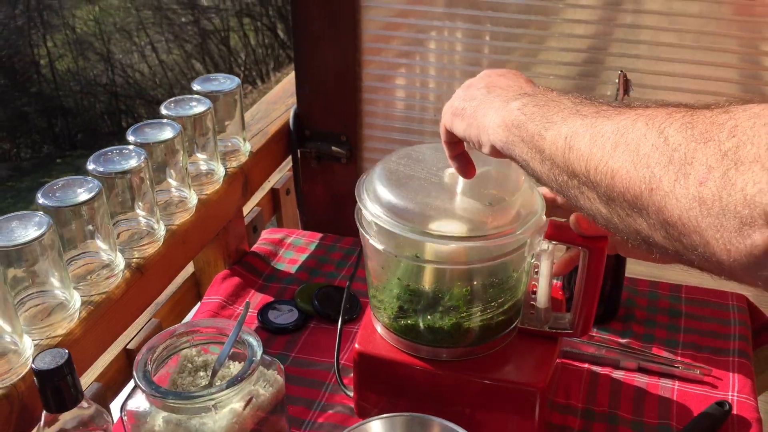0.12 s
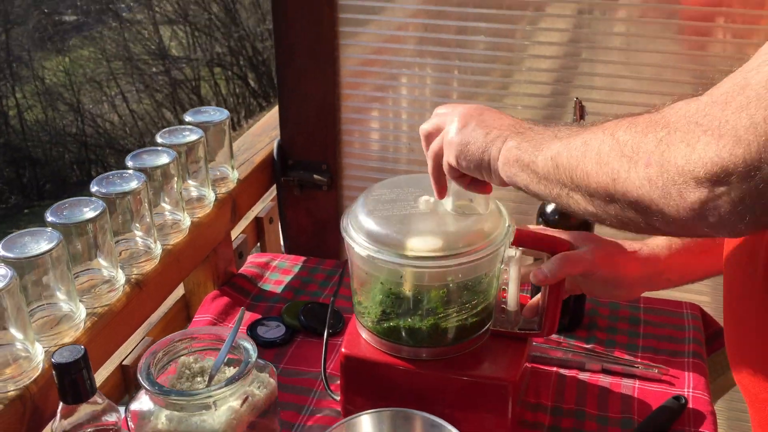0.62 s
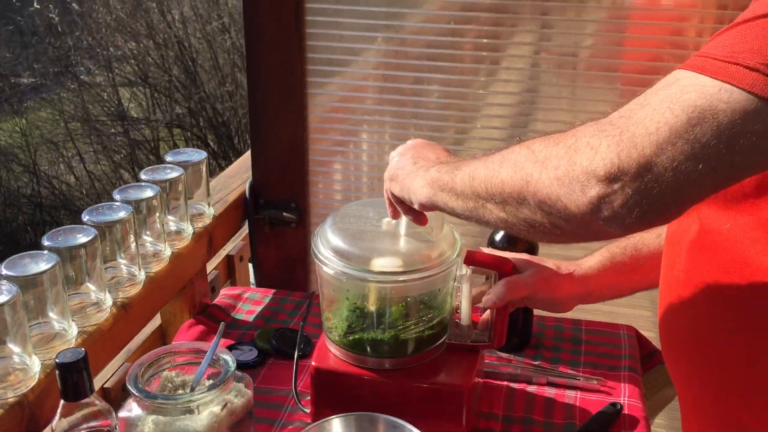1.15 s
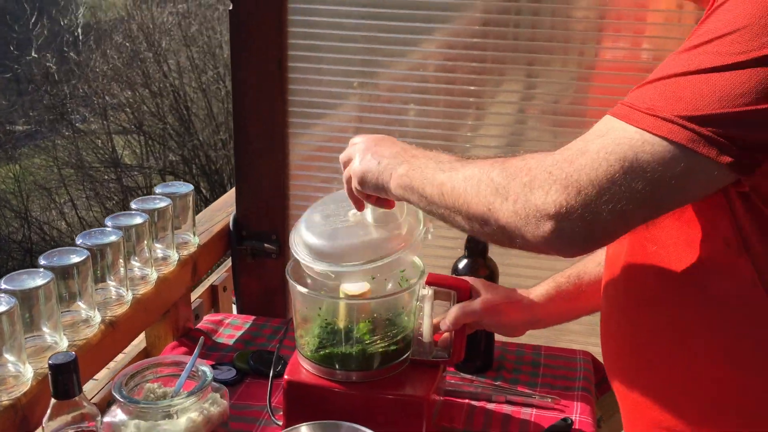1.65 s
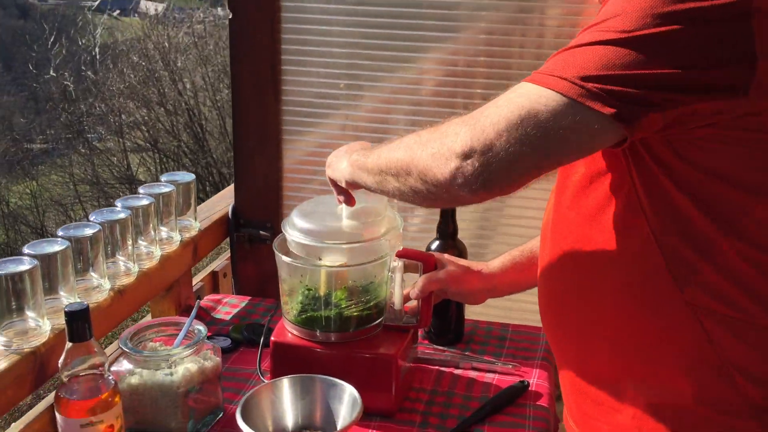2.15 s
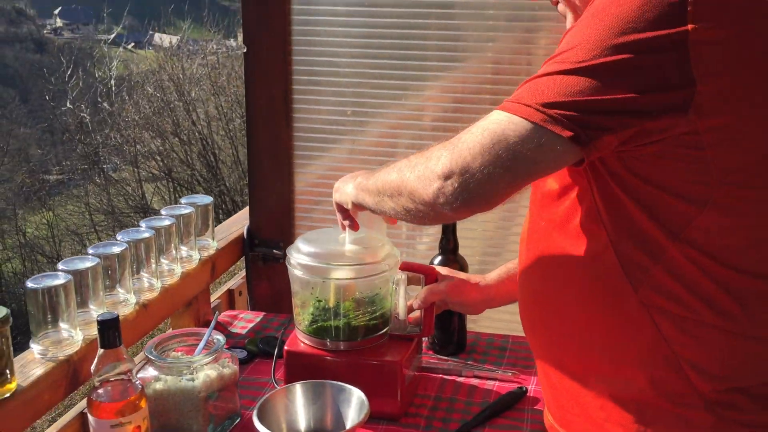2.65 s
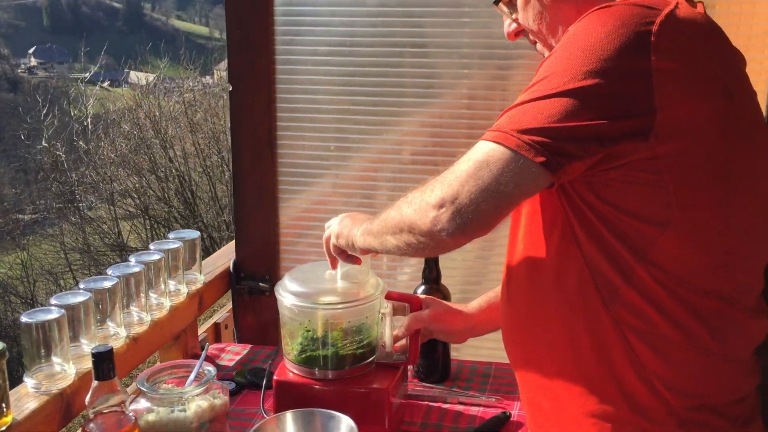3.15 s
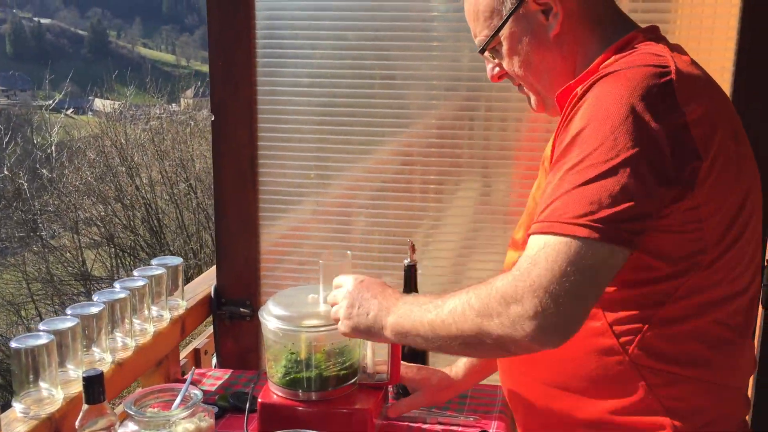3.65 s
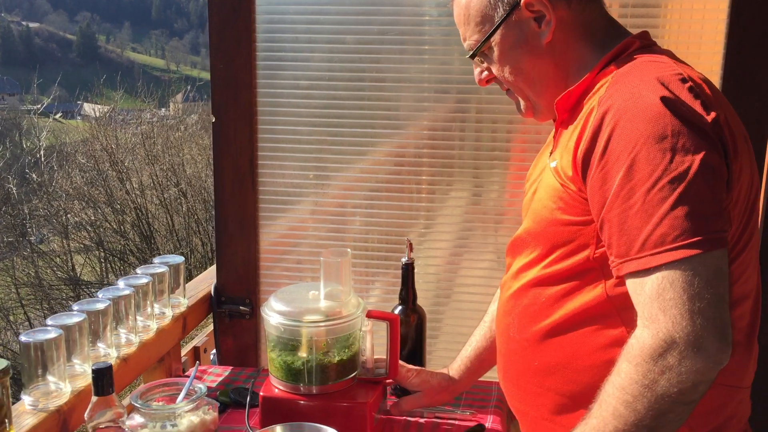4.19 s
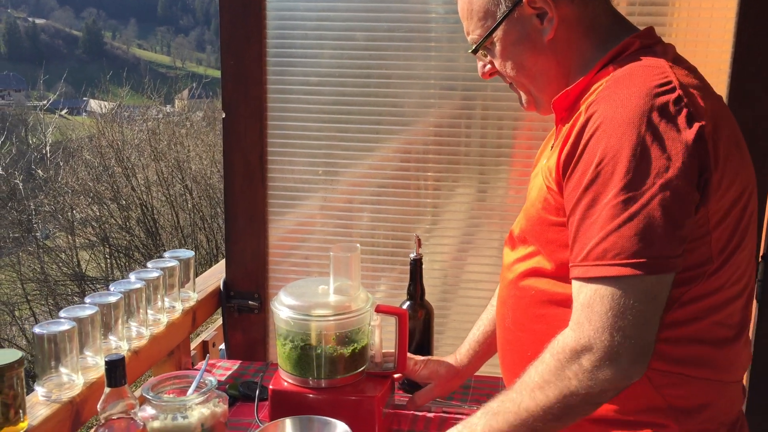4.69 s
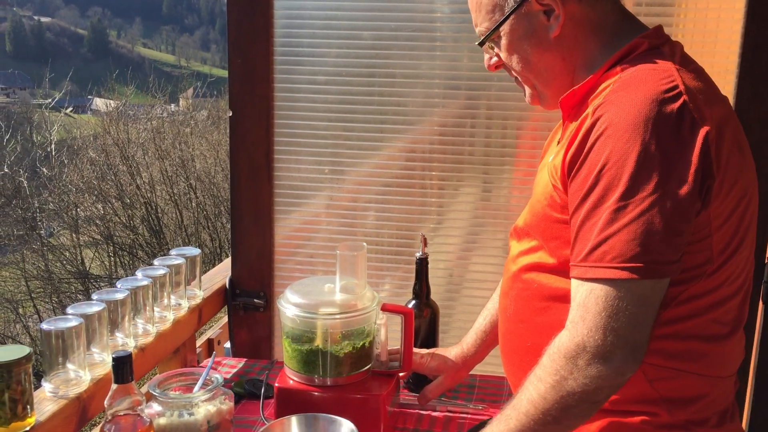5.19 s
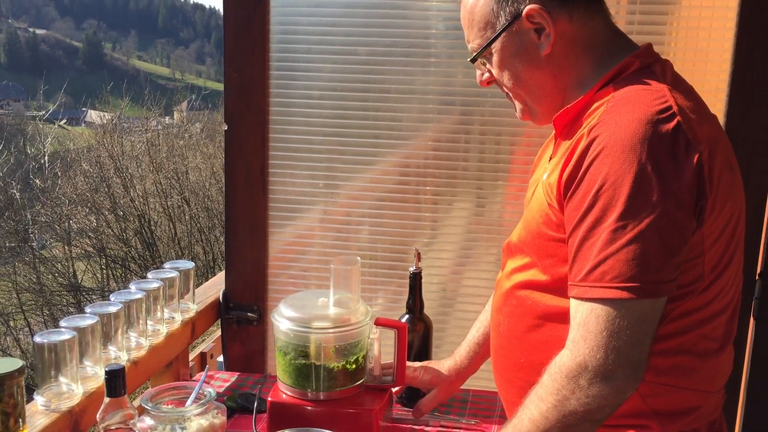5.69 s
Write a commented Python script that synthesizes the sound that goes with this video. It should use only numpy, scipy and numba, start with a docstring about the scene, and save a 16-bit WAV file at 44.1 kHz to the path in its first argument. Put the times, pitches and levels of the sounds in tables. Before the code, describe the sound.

A hollow plastic lid scrapes and knocks onto a food processor bowl, then a switch clicks and the motor churns wet leaves in a steady rough whir.

```python
"""A distant valley hush and a light, boomy scrape: on a breezy balcony a plastic lid slides on a bowl's rim.
Knocks, scrapes and a latch follow as a hand fits the lid to the food processor. Blows and friction ring
the shell modes, and the air in the bowl booms lower as the gap under the lid closes. Then a switch clicks
and a mains motor whirls a blade through leaves: rough noise pulsing with the turn, a growl and a thin whine.
Low, shaped noise swells for gusts on the microphone and for thumps of the table under some knocks."""
import sys
import numpy as np
from scipy import signal
from scipy.fft import rfft, irfft
from scipy.io import wavfile
from scipy.ndimage import uniform_filter1d
from numba import njit

SR = 44100
rng = np.random.default_rng(int(sys.argv[2]) if len(sys.argv) > 2 else 0)


def linear_from_db(decibels):
    """Turn decibels (scalar or array-like) into linear amplitude factors; 0 gives 1."""
    return 10 ** (np.asarray(decibels, float) / 20)


def put_to_file(sound):
    """Save the sound as 16-bit audio at rate SR, in the file named by the first command-line argument."""
    columns = np.atleast_2d(sound).T  # one column per channel
    safe = np.clip(columns, -1, 1)
    whole_steps = np.round(safe * 32767)
    wavfile.write(sys.argv[1], SR, whole_steps.astype(np.int16))


N = 256662
T = np.arange(N) / SR

# distant hush, spectrum before scaling: f/Hz, level/dB
VALLEY_COLOUR = [(88, -27.5), (150, 3.5), (226, -3.5), (328, 0.5), (475, -5), (805, -1.5), (4950, -26),
                 (5460, -25), (12700, -31), (16000, -40.5)]
# swells of low noise, gusts and table thumps together: start t/s, length t/s, level/dB
LOW_SWELLS = [(0.294, 0.12, -59), (0.523, 0.046, -55), (0.721, .06, -44.5), (1.2, .1, -60),
              (1.547, 0.032, -42.5), (1.697, 0.027, -36), (1.84, 0.024, -37.5), (2.066, 0.035, -36),
              (2.416, 0.085, -34), (2.59, 0.12, -39), (2.89, 0.067, -45), (3.095, 0.15, -40),
              (3.626, 0.02, -40), (3.76, 0.9, -43), (4.156, .43, -30), (4.782, 0.31, -38.5),
              (5.359, 0.144, -37.5), (5.76, .1, -43)]
# low thumps of the table under the knocks: start t/s, length t/s, level/dB
TABLE_THUMPS = [LOW_SWELLS[i] for i in (1, 2, 10)]
# gusts on the microphone: start t/s, length t/s, level/dB
GUSTS = [row for row in LOW_SWELLS if row not in TABLE_THUMPS]
# spectrum of gusts and thumps before scaling: f/Hz, level/dB
LOW_COLOUR = [(12, -33), (20, 3.5), (77, -7.5), (129, -12), (189, -23.5), (242, -32), (400, -54),
              (520, -71.5), (880, -120)]
# lid sliding on the rim: start t/s, length t/s, scrape level/dB, boom level/dB relative to the scrape
SLIDES = [(-.02, 0.069, -47.5, 9), (0.051, 0.089, -44, 11.5), (0.203, 0.067, -44, -10),
          (0.864, 0.12, -58, -4.5), (0.957, .06, -61, -8.5), (1.1, 0.099, -67, 19), (1.545, .15, -46.5, 12),
          (2.17, 0.38, -58, -2), (2.16, 0.059, -52, -0.5), (2.234, 0.074, -47.5, -1), (2.325, .1, -48, 0.5),
          (2.446, 0.09, -56.5, 8), (2.543, 0.053, -50, 6), (2.717, 0.046, -32, -2), (2.969, 0.17, -51, -6),
          (3.541, 0.037, -54.5, -4.5), (3.582, 0.033, -53.5, -8), (4.05, .02, -49.5, 4),
          (1.752, 0.048, -63.5, 0), (1.977, 0.076, -68, -3.5), (0.517, 0.031, -55.5, 4)]
# modes of bowl and lid: f/Hz, level/dB, decay by 60 dB under a blow t/s
SHELL_MODES = [(582, -6, .014), (644, -9, 0.047), (930, -5.5, .01), (1243, -3.5, 0.0073), (1410, 1, 0.0099),
               (1535, 2.5, 0.0063), (1725, -4, 0.0066), (2190, -3, 0.0095), (2316, -4.5, 0.011),
               (2523, -5, 0.022), (2840, -2, 0.0065), (3290, -7, 0.0073), (3570, -4.5, 0.01),
               (4230, -7.5, 0.012), (5400, -10.5, 0.0056), (5230, -10, 0.009), (6490, -14.5, 0.023)]
# air in the bowl, lower as the gap under the lid closes: t/s, f/Hz
BOWL_AIR = [(0, 460), (.15, 288), (.29, 275), (.33, 211.5), (.7, 192), (.735, 136), (1.12, 168),
            (1.262, 210.3), (1.62, 198), (1.67, 346), (2.1, 362.6), (2.43, 417), (2.53, 334), (2.73, 362.5),
            (2.9, 154.5), (3.05, 345), (3.19, 222.6), (4.06, 374.5), (4.1, 243)]
# knocks of lid on bowl, the last two from the switch:
# t/s, clack level/dB, treble and boom level/dB relative to the clack, contact decay constant t/ms
BLOWS = [(0.184, -32, -5, -45, 3.7), (0.244, -22, -2.5, 0.5, 5.5), (0.284, -15.5, -11.5, -3, 5.3),
         (0.3, -19, -3.5, -3, 10.6), (0.331, -15.5, -13, 0, 3.4), (0.549, -15, -1.5, -8.5, 1.56),
         (0.637, -27, -8.5, -13, 5.2), (0.664, -35.5, -17.5, 7.5, 0.47), (0.696, -21, -7, -31, 10.6),
         (0.704, -2.7, -2.5, -10, 2.1), (0.73, -5.5, -5, -7.5, 3.3), (0.985, -38, -22.5, -8, 3.4),
         (1.115, -42.5, -16, 16, 1.1), (1.239, -30, -7, -2.2, 2.6), (1.261, -7, -2.2, -2.5, 2.9),
         (1.361, -21.5, -12.5, -41.5, 4.1), (1.455, -45.5, -29.5, 6, 3.4), (1.504, -23.5, -30.5, -1, 2.2),
         (1.536, -31.5, -24, -5, 5), (1.565, -22, -9.5, -21, 3.9), (1.613, -22.5, -11, -6, 5.7),
         (1.631, -32.5, -3.5, 1, 9.6), (1.668, -27, -1.6, 0.5, 5.4), (2.108, -20, -27, -0.7, 9.6),
         (2.137, -14, -23, -4, 8.1), (2.35, -35, -36, 5.5, 36), (2.384, -32, -24, -12, 7.9),
         (2.426, -20, -40, -1.7, 4.6), (2.531, -40.5, -22, 9.5, 12), (2.586, -38, -28, 11, 4),
         (2.643, -20.5, -4.5, -3.5, 5), (2.731, -23.5, -5, -27, 13), (2.782, -23.5, 0, 0, 5.2),
         (2.804, -19.5, -12, -3, 14), (2.836, -10, -6, -11, 5.9), (2.85, -22, -22, -3, 0.69),
         (2.899, -8, -12, -5, 7.3), (3.047, -25, -3, -11.5, 2), (3.184, -10.5, -13.5, -10, 7.2),
         (4.063, -25.5, -11, -23, 4.2), (4.1, -27, -13, -14, 1.8)]
# low jolts of the base on the table, one at the switch, one as the blade takes load:
# t/s, level/dB, f/Hz, decay by 60 dB t/s
BASE_JOLTS = [(4.054, -26, 90, 0.028), (4.208, -14.5, 106.5, .12)]
# spectrum of churning leaves before scaling: f/Hz, level/dB
CHURN_COLOUR = [(180, -49.5), (300, -9), (348, 0.5), (470, -17.5), (713, -9), (774, -17), (930, -8),
                (1030, -12.5), (1340, -9.5), (1750, -11), (3520, -14), (4500, -21.5), (4910, -22.5),
                (7900, -29.5), (13800, -28), (16000, -30.5)]
# resonances that the churning excites: f/Hz, width f/Hz, level/dB relative to the churn
CASING_MODES = [(1372, 225, -18.5), (2190, 30, -30.5), (3620, 54, -29), (5246, 150, -30.5),
                (6060, 223, -23), (8620, 260, -27), (9100, 300, -35)]
# bowl wall resonances: f/Hz, width f/Hz, level/dB before scaling
WALL_MODES = [(340, 61, -4.5), (184, 106, -5.5)]
# leaves bunch up and slap the bowl wall: t/s, level/dB above the wall's usual
LEAF_CLUMPS = [(4.7, 2.8), (5.0, 5.1), (5.42, 10), (5.57, 7.7)]
# rotor-slot whine at full speed: offset from the slot tone in multiples of RIPPLE_HZ, rms level/dB
WHINE_LINES = [(-4, -55), (-3, -56), (-2, -47), (-1, -53), (0, -45), (1, -55)]
# overall tone, microphone colour and then a steep band limit near 15.8 kHz: f/Hz, level/dB
TONE_AND_BAND_LIMIT = [(20, -25.5), (45, -6.5), (70, 1), (9500, -2.5), (10500, -9), (11500, -4),
                       (15720, -6), (15900, -60.5)]

VALLEY_DB, CALM_DB = -57.5, -72.5  # hush, and the low noise between swells
SWELL_RISE_DB_PER_S, SWELL_FALL_DB_PER_S = 204.5, 140
SLIDE_EDGE = 0.69  # share of a slide's length that each ramp lasts, centred on its start or end
SLIDE_TREBLE_DB = -16
SLIDE_RING = 1.8  # a light touch lets the modes ring this much longer than under a blow
# a blow that moves much air lands on the dome and rings low; a blow on the stiff rim rings high
CLACK_HZ, OCTAVES_PER_BOOM_DB = 1450, -.035
OCTAVES_PER_TREBLE_DB = .02  # a soft, dull blow also favours the low modes
ATTACK_SHARE = 0.33  # attack constant as a share of the contact's decay constant
START_S, RUN_DB, WALL_DB, TREBLE_DB = 4.1, -32.5, -41, 2  # RUN_DB is ahead of the speed factor
# unloaded, the blade overshoots, bites into the leaves at LOAD_S, bogs down and recovers
LOAD_S, OVERSHOOT_DB, BOG_DB, RECOVER_S = 4.18, 5.5, -5.5, 0.113
START_DULL_DB, START_WALL_DB, SETTLE_S = -10.5, 17, 0.13
BOG_DULL_DB, BOG_S = -7, 4.3  # the treble sags most a moment after the bite
CLUMP_S = 0.056
# slot tone and shaft rate at full speed; ripple at twice the mains rate
SLOT_HZ, RIPPLE_HZ, SHAFT_HZ, HUM_DB = 932.3, 100, 23.8, -55
BALCONY_T60_S, BALCONY_DB = 0.13, -10.5
CEILING = .8  # amplitude that the loudest peaks bend towards


def unit(x):
    """Scale to rms 1."""
    return x / np.sqrt(np.mean(x ** 2))


def colour(x, points):
    """Shape the spectrum by f/Hz, level/dB points, joined on a log frequency axis."""
    hz, db = np.transpose(points)
    f = np.maximum(np.arange(len(x) // 2 + 1) * SR / len(x), 1)
    return irfft(rfft(x) * linear_from_db(np.interp(np.log(f), np.log(hz), db)), len(x))


def walk(rate):
    """Random levels held 1 / rate s and slewed twice; rms 1."""
    k = int(SR / rate)
    steps = np.repeat(rng.standard_normal(N // k + 1), k)
    return unit(uniform_filter1d(uniform_filter1d(steps, k), k)[:N])


def grit(rough):
    """Dense clicks of very uneven size, more uneven as rough rises."""
    return unit(rng.standard_normal(N) * linear_from_db(rough * rng.exponential(size=N)))


@njit
def svf(x, hz, width):
    """Band-pass with a moving centre and a gain of 1 there."""
    y, b, l = np.empty(len(x)), 0., 0.  # b and l: band and low-pass states
    for i in range(len(x)):
        g, k = np.tan(np.pi * hz[i] / SR), width / hz[i]
        v = (b + g * (x[i] - l)) / (1 + g * (g + k))
        b, l, y[i] = 2 * v - b, l + 2 * g * v, k * v
    return y


def resonate(x, peaks):
    """Sum of fixed resonances, neighbours in opposite phase."""
    out = 0
    for k, (hz, width, db) in enumerate(peaks):
        out = out + (-1) ** k * linear_from_db(db) * unit(svf(x, np.full(N, 1. * hz), 1. * width))
    return out


def bright(x, hz):
    """High-pass, rolling off towards the top."""
    return colour(x, [(hz / 2, -30), (hz, 0), (9000, -5), (16000, -13)])


def valley_hush():
    """Distant hush of the valley: shaped noise that wanders slowly in level."""
    return linear_from_db(VALLEY_DB + 2.5 * walk(2.0)) * unit(colour(rng.standard_normal(N), VALLEY_COLOUR))


def gusts_and_thumps():
    """Low noise that swells as the breeze buffets the microphone and as the table thumps under knocks."""
    swell_levels = []
    for s, length, db in GUSTS + TABLE_THUMPS:
        rise = SWELL_RISE_DB_PER_S * np.maximum(s - T, 0)
        fall = SWELL_FALL_DB_PER_S * np.maximum(T - s - length, 0)
        swell_levels.append(db - rise - fall)
    swell_db = np.max(swell_levels, axis=0)
    low_noise = unit(colour(rng.standard_normal(N), LOW_COLOUR))
    return (linear_from_db(swell_db) + linear_from_db(CALM_DB)) * low_noise


def slide():
    """Rim friction, catching and slipping, feeds the shell modes and the bowl's air."""
    touch, air = np.zeros(N), np.zeros(N)
    for s, length, db, boom_db in SLIDES:
        inside = np.minimum(T - s, s + length - T)
        press = np.clip(inside / (SLIDE_EDGE * length) + .5, 0, 1) ** 2
        touch += press * linear_from_db(db)
        air += press * linear_from_db(db + boom_db)
    slip_db, patch_db, rough = 4, 6.5, 2.8
    rub = unit(grit(rough) * linear_from_db(slip_db * walk(90)))
    # the contact wanders round the rim, so each mode comes and goes
    shell = np.zeros(N)
    for hz, db, t60 in SHELL_MODES:
        width = np.log(1000) / np.pi / (SLIDE_RING * t60)
        shell += linear_from_db(patch_db * walk(24.95)) * resonate(rub, [(hz, width, db)])
    hiss = unit(colour(rub, [(2500, -24.5), (5000, -0.5), (16000, -3.5)]))
    hiss = linear_from_db(SLIDE_TREBLE_DB + slip_db * walk(52)) * hiss
    boom = unit(svf(rub, np.interp(T, *np.transpose(BOWL_AIR)), 74.0))
    return touch * (unit(shell) + hiss) + air * boom


def knocks():
    """A short rattling contact rings the shell, spits treble and sets the air in the bowl booming."""
    out, t = np.zeros(N + SR), T[:SR // 4]
    # nine randomly detuned copies of each mode spread the clack into a dense, less tonal knock
    hz, db, t60 = np.repeat(np.array(SHELL_MODES), 9, axis=0).T[:, :, None]
    spread = .11
    for s, clack_db, treble_db, boom_db, ms in BLOWS:
        tune, side = rng.uniform(-1.1, 1, (2, len(hz), 1))
        noise = rng.standard_normal((2, len(t)))
        contact = (1 - np.exp(-t * 1000 / (ATTACK_SHARE * ms))) * np.exp(-t * 1000 / ms)
        # where the blow lands favours the modes near its centre
        centre_hz = CLACK_HZ * 2 ** (OCTAVES_PER_BOOM_DB * boom_db + OCTAVES_PER_TREBLE_DB * treble_db)
        weight_db = db - 4 * np.log2(hz / centre_hz) ** 2
        modes = np.sin(2 * np.pi * hz * (1 + spread * tune) * t) * np.sign(side)
        ring = (linear_from_db(weight_db) * modes * 1000. ** (-t / t60)).sum(0)
        # a fainter, longer rattle trails the contact
        rattle = contact + 0.07 * 1000. ** (-t / 0.11)
        clack = signal.fftconvolve(noise[0] * rattle, ring)[:len(t)]
        spit = bright(noise[1], 3200) * (contact + 0.13 * 1000. ** (-t / 0.064))
        # the boom starts sharp and sags to its pitch
        boom_hz = np.interp(s + 0.0061, *np.transpose(BOWL_AIR))
        sag = np.cumsum(1 + 0.11 * np.exp(-t / 0.012)) / SR
        boom = np.sin(2 * np.pi * boom_hz * sag)
        boom *= (1 - np.exp(-t / 0.0013)) * 1000. ** (-t * boom_hz / 18)
        boom = colour(boom, [(40, -19.5), (110, -2.5), (16000, 1)])
        i = int(s * SR)
        for part, part_db in ((clack, 0), (spit, treble_db), (boom, boom_db)):
            # equal energy for every part ahead of its level
            out[i:i + len(t)] += linear_from_db(clack_db + part_db) * part / np.sqrt(np.sum(part ** 2) / 150)
    return out[:N]


def motor():
    """Leaves churn with each turn against the bowl; the rotor growls, then whines as it reaches speed."""
    on, loaded = np.maximum(T - START_S, 0), np.clip((T - LOAD_S) / 0.056, 0, 1)
    spin_up = on / (LOAD_S - START_S)
    speed = np.tanh((on / .09) ** 2)
    turn = 2 * np.pi * np.cumsum(speed) / SR

    bog_db = BOG_DB * np.exp(-np.maximum(T - LOAD_S, 0) / RECOVER_S)
    churn_db = RUN_DB + (1 - loaded) * OVERSHOOT_DB * np.minimum(spin_up, 1) + loaded * bog_db
    treble_db = TREBLE_DB + START_DULL_DB * np.maximum(1 - spin_up, 0)
    treble_db = treble_db + BOG_DULL_DB * np.exp(-((T - BOG_S) / 0.041) ** 2)
    sweep_db = 0.76 * np.cos(SHAFT_HZ * turn + 1.3 * walk(0.62)) + 0.57 * np.cos(2 * SHAFT_HZ * turn)
    shreds = grit(2.3) * linear_from_db(0.81 * walk(150))
    churn = unit(colour(shreds, CHURN_COLOUR)) + resonate(grit(2.3), CASING_MODES)
    high = svf(churn, np.full(N, 9000.), 8800.0)
    churn = unit(churn + (linear_from_db(treble_db) - 1) * high)
    churn *= (0.42 + 0.63 * speed) * linear_from_db(churn_db + sweep_db + 0.46 * walk(30))

    wall_db = WALL_DB + START_WALL_DB * np.exp(-on / SETTLE_S)
    for s, db in LEAF_CLUMPS:
        wall_db = wall_db + db * np.exp(-((T - s) / CLUMP_S) ** 2)
    wall = linear_from_db(wall_db + 3.2 * walk(23)) * unit(resonate(grit(2.3), WALL_MODES))

    whine, waver_db = np.zeros(N), 2.2
    for k, db in WHINE_LINES:
        line = np.sin(SLOT_HZ * turn + 2 * np.pi * k * RIPPLE_HZ * T)
        whine += linear_from_db(db + waver_db * walk(15)) * line
    hum = linear_from_db(HUM_DB) * np.sin(2 * np.pi * 2 * RIPPLE_HZ * T)

    # the inrush current makes the rotor growl, rough and rising, until it is at speed
    rise_s, width = .1, 900.
    growl_hz = 300 + 550 * np.minimum(on / rise_s, 1)
    growl = unit(svf(svf(grit(0.95), growl_hz, width), growl_hz, width))
    growl *= linear_from_db(-28.5) * np.minimum(on / 0.016, 1) * np.exp(-(on / rise_s) ** 6)

    jolts = np.zeros(N)
    for s, db, hz, t60 in BASE_JOLTS:
        decay = 1000. ** (-np.maximum(T - s, 0) / t60)
        jolts += linear_from_db(db) * (T > s) * np.sin(2 * np.pi * hz * (T - s)) * decay

    leaves = np.minimum(on / .04, 1) * churn + np.minimum(on / 0.016, 1) * wall
    return leaves + growl + jolts + np.sqrt(2) * speed ** 8 * (whine + hum)


def scene():
    """Table, panel and wall give the hand's sounds a short dull tail; all other layers stay dry."""
    background = valley_hush() + gusts_and_thumps()
    hand = slide() + knocks()
    t = T[:SR // 3]
    tail = colour(rng.standard_normal(len(t)), [(200, 7), (1500, 3.0), (8000, -7)])
    tail *= 1000. ** (-t / BALCONY_T60_S) * (t > .003)
    wet = signal.fftconvolve(hand, tail / np.sqrt(np.sum(tail ** 2)))[:N]
    return (hand + linear_from_db(BALCONY_DB) * wet + motor() + background)[None]


def low_pass(x):
    """Removes everything above the highest recorded frequency."""
    return signal.sosfilt(signal.butter(12, 16830, fs=SR, output="sos"), x)


def record(dry):
    """A phone microphone colours the mix, a steep band limit cuts the top, and the loudest peaks round off."""
    heard = colour(dry[0], TONE_AND_BAND_LIMIT)[None]
    mix = CEILING * np.tanh(heard / CEILING)
    return low_pass(mix)


dry = scene()
out = record(dry)
put_to_file(out)
```